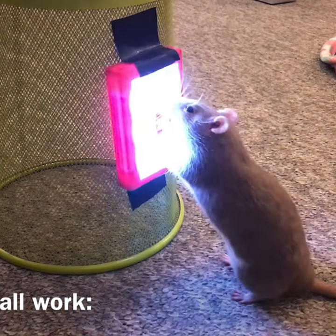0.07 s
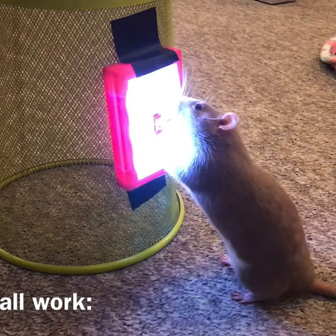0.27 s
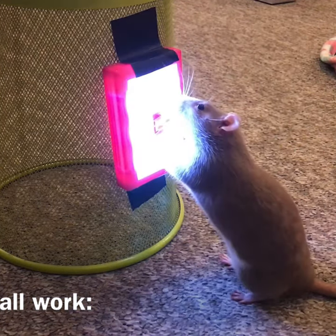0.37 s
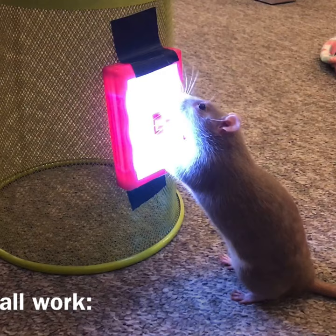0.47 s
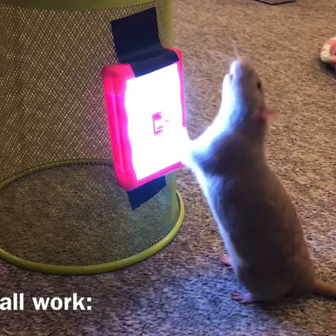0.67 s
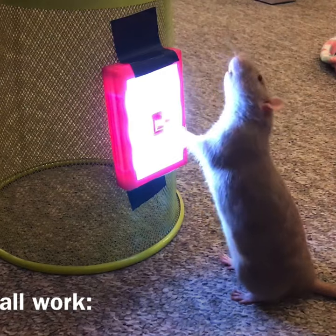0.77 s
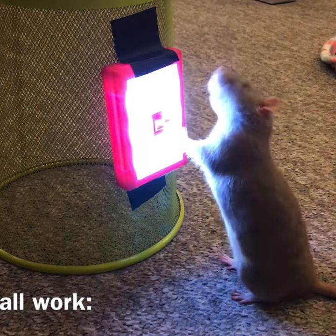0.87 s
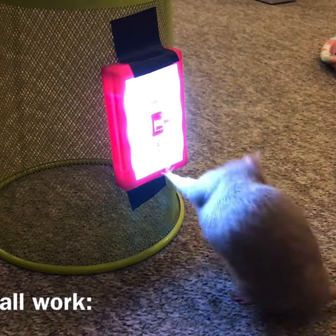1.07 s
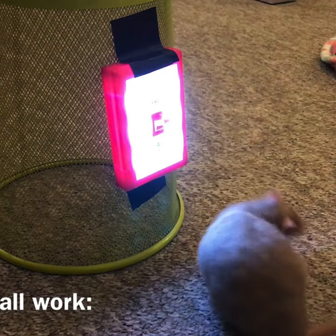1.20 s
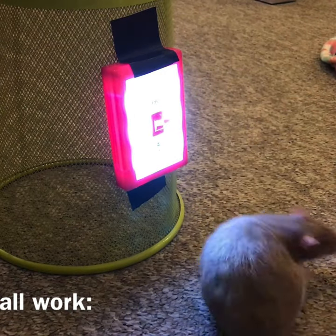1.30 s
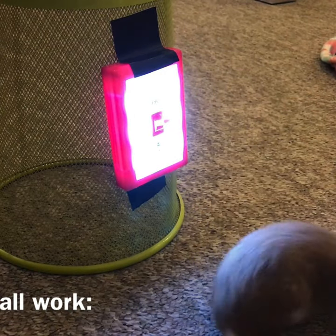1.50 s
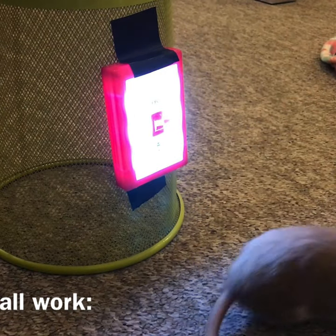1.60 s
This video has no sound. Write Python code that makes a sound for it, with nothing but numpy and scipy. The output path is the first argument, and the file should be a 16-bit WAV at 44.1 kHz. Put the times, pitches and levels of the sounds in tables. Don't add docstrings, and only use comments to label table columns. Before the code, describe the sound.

A plastic push light clicks twice under a rat's paws in a quiet carpeted room

```python
import sys
import numpy as np
from scipy import signal
from scipy.fft import rfft, irfft, next_fast_len
from scipy.io import wavfile
from scipy.ndimage import map_coordinates

SR = 44100
rng = np.random.default_rng(int(sys.argv[2]) if len(sys.argv) > 2 else 0)


def to_wav(s):
    ch = np.atleast_2d(s).T
    pcm = np.round(np.clip(ch, -1, 1) * 32767)
    wavfile.write(sys.argv[1], SR, pcm.astype(np.int16))


def how_loud(loudness_db):
    steps = np.asarray(loudness_db, float) / 20
    return 10 ** steps


N = 72765

# freq_hz, density_db_per_hz
RUMBLE_SPECTRUM = [(15, -36), (25, -1), (107, 1), (199, 2.5), (350, -2.5), (469, -9), (692, -10),
                   (926, -18.5), (1200, -29.5), (1560, -52.5), (2640, -120)]
# freq_hz, density_db_per_hz
HISS_SPECTRUM = [(530, -31.5), (900, -5), (1950, -2.5), (2120, -4.5), (2300, -5.5), (5000, -7),
                 (15500, -13.5)]
RUMBLE_DB, RUMBLE_LURCH_DB, HISS_DB = -67.5, 1.2, -76
LOW_CUT_HZ, TOP_HZ = 48, 15700

# freq_hz, t60_s
ROOM_T60 = [(600, 0.15), (1500, 0.25), (3500, 0.24), (6000, 0.37)]
# freq_hz, level_db
PRESS_ROOM_TONE = [(1000, -25.5), (1350, -1), (1650, -1.5), (2000, -11.5), (3400, 0), (4400, -14),
                   (5600, -26.5), (6600, -48.5)]
# freq_hz, level_db
RELEASE_ROOM_TONE = [(1050, -22), (1400, 1.5), (2000, -4.5), (3500, 2), (4400, -10.5), (5000, -12),
                     (6100, -17.5), (6900, -44)]
ROOM_DB, ROOM_START_S, ROOM_RISE_S, ROOM_HOLD_S = -46.5, 0.002, 0.0053, 0.03
ROOM_GRAIN_DB, LATE_DB, LATE_STRETCH = 1.5, -19, 3.7
WALL_DELAY_S = [.0045, .0068, .0085, .013, .016, .021]
WALL_LEVEL_DB = [-24, -17, -20, -17, -19, -23]

# start_s, pitch_hz, level_db
GROAN_PATH = [(0.278, 329.6, -80), (0.352, 229.9, -73), (.48, 288.2, -73.5), (0.579, 405.1, -74),
              (0.634, 147.5, -71.5), (.68, 183.7, -63.5), (0.708, 400.5, -74), (.79, 390, -80.5),
              (.87, 165.2, -72.5), (0.943, 163.4, -64), (1.002, 174.7, -70), (1.119, 305, -72),
              (1.219, 187.9, -64), (1.265, 182.5, -64), (1.339, 395.6, -73.5), (1.432, 222.7, -69.5),
              (1.511, 407.3, -68.5), (1.578, 255.6, -69)]
GROAN_WAVER, GROAN_FLUTTER_DB = 0.06, 5
OVERTONE_DB, GROAN_BLUR_S = -18.5, 0.015
BOOM_HZ, BOOM_WIDTH_HZ, BOOM_DB = 165.5, 36, 7

# start_s, length_s, level_db
FUR_SWELLS = [(0.091, 0.014, -68), (0.076, 0.075, -80.5), (0.754, 0.081, -75), (0.867, 0.18, -77),
              (1.05, 0.056, -95), (1.213, 0.052, -74.5), (1.26, 0.21, -82)]
# freq_hz, density_db_per_hz
FUR_SPECTRUM = [(300, -5.5), (1000, 8), (2500, 2), (4300, 0.5), (5600, 9), (6500, -5), (9500, -0.5),
                (14000, -12.5)]
# start_s, length_s, level_db
WHISKER_SWELLS = [
    (.088, .021, -72),
    (.76, 0.082, -81.5),
    (1.215, 0.025, -77.5),
]
# freq_hz, density_db_per_hz
WHISKER_SPECTRUM = [(4000, -35), (7500, 2), (9500, -3), (11500, -7), (14000, 0.5), (15600, -9)]
# start_s, length_s, level_db
PAW_SWELLS = [
    (0, 0.058, -75),
    (.075, .13, -71.5),
    (.68, 0.15, -84.5),
    (1.0, 0.11, -85.5),
    (1.25, 0.076, -81),
]
# freq_hz, density_db_per_hz
PAW_SPECTRUM = [(250, -35.5), (450, 2), (800, 4.5), (1000, -8), (1800, -11), (3000, -27)]

# start_s, level_db, pitch_hz, scratch_db
CLAW_TICKS = [(0.1278, -56, 1450, -3), (0.1653, -55.5, 1460, -4.5), (0.211, -68, 1480, -5),
              (0.365, -81, 3020, 26), (.845, -72, 408, -8), (.948, -87, 910, 9), (1.057, -62.5, 710, -5),
              (1.085, -64, 610, -6.5), (1.133, -55, 565, -6.5), (1.258, -63, 611.6, -7),
              (1.487, -59.5, 302.3, -8.5)]
# freq_hz, density_db_per_hz
SCRATCH_SPECTRUM = [(500, -4), (1500, 4.5), (3500, 1.5), (6000, -3.5), (7500, -8), (15000, -25)]
TICK_CYCLES, SCRATCH_S, TICK_ROOM_DB = 0.9, 0.0031, -22.5

SNAP_START_S = [.2184, .3680]
# level_db, polarity, room_share_db
SNAP_LEVELS = [
    (-23.5, 0.98, 1.5),
    (-26.5, -1.09, -3.5),
]
# freq_hz, level_db, decay_s
PRESS_MODES = [(1456, 0.5, 0.00066), (3030, 2.5, 0.00033), (2534, -13.5, 0.00057), (3500, -9.5, .0005),
               (4860, -15, 0.00034), (730, -27, 0.0018), (1341, -20, 0.0021), (6900, -37, .0003),
               (380, -33.5, 0.0023)]
# freq_hz, level_db, decay_s
RELEASE_MODES = [(1502, -4, 0.00066), (3120, -2.5, 0.00038), (2780, -4.5, 0.00039), (3760, -12.5, 0.0006),
                 (4854, -16.5, 0.00068), (766, -15, 0.00059), (1350, -27, 0.0037), (5820, -19.5, 0.00044),
                 (400, -20.5, 0.0005)]
MODE_LAG_S = [0, .0001, .0001, .0006, .0007, 0, .001, 0, 0]
NULL_HZ, NULL_Q = 996, 2.5


def unit(x):
    return x / np.sqrt(np.mean(x ** 2) + 1e-20)


def along(points, hz):
    f, v = np.transpose(points)
    return np.interp(np.log(hz + 1), np.log(f + 1), v)


def wobble(rate_hz):
    knots = rng.standard_normal(int(N / SR * 200) + 4)
    return map_coordinates(knots, [np.arange(N) * min(rate_hz, 199) / SR])


def filtered(x, response):
    m = next_fast_len(len(x) + 8192)
    gain = response(np.fft.rfftfreq(m, 1 / SR))
    return irfft(rfft(x, m) * gain, m)[:len(x)]


def noise(spectrum):
    return unit(filtered(rng.standard_normal(N), lambda hz: how_loud(along(spectrum, hz))))


def swells(rows):
    t = np.arange(N) / SR
    out = np.zeros(N)
    for start_s, length_s, level_db in rows:
        progress = np.clip((t - start_s) / length_s, 0, 1)
        out += how_loud(level_db) * np.sin(np.pi * progress) ** 0.5
    return out


def ring(start_s, hz, decay_s):
    t = np.clip(np.arange(N) / SR - start_s, 0, None)
    envelope = (t / decay_s / 2) ** 2 * np.exp(2 - t / decay_s)
    return envelope * np.sin(2 * np.pi * hz * t)


def room(hits, tone):
    out = np.zeros(N + SR)
    half = SR // 2
    for start_s, level_db in hits:
        grains = rng.standard_normal(half) * how_loud(ROOM_GRAIN_DB * wobble(210)[:half])
        hz, t, z = signal.stft(grains, SR, nperseg=256)
        fall_db = -60 * np.clip(t - ROOM_HOLD_S, 0, None) / along(ROOM_T60, hz)[:, None]
        decay = how_loud(fall_db) + how_loud(LATE_DB + fall_db / LATE_STRETCH)
        colour = how_loud(along(tone, hz)[:, None])
        tail = signal.istft(z * colour * decay, SR, nperseg=256)[1]
        tail = tail / np.sqrt(np.mean(tail[:SR // 20] ** 2))
        t = np.arange(len(tail)) / SR
        build_up = np.clip((t - ROOM_START_S) / ROOM_RISE_S, 0, 1)
        out[round(start_s * SR):][:len(t)] += how_loud(level_db) * tail * build_up
    return out[:N]


def walls(x):
    taps = np.zeros(SR // 20)
    for delay_s, level_db in zip(WALL_DELAY_S, WALL_LEVEL_DB):
        pair = np.array([0.6, -0.5])
        taps[round(delay_s * SR) + np.array([0, 5])] = how_loud(level_db) * rng.choice([-1, 1]) * pair
    return x + signal.fftconvolve(x, taps)[:N]


def rumble_and_hiss():
    rumble = how_loud(RUMBLE_DB + RUMBLE_LURCH_DB * wobble(20)) * noise(RUMBLE_SPECTRUM)
    return rumble + how_loud(HISS_DB) * noise(HISS_SPECTRUM)


def groan():
    start_s, pitch_hz, level_db = np.transpose(GROAN_PATH)
    t = np.arange(N) / SR
    hz = np.interp(t, start_s, pitch_hz) * (1 + GROAN_WAVER * wobble(30))
    phase = 2 * np.pi * np.cumsum(hz) / SR
    level = how_loud(np.interp(t, start_s, level_db, left=-120) + GROAN_FLUTTER_DB * wobble(35.28))
    tone = level * (np.sin(phase) + how_loud(OVERTONE_DB) * np.sin(2 * phase))
    blur = rng.standard_normal(SR // 5) * np.exp(-t[:SR // 5] / GROAN_BLUR_S)
    tone = tone + 0.5 * signal.fftconvolve(tone, blur / np.linalg.norm(blur))[:N]
    return filtered(tone, lambda f: how_loud(BOOM_DB * np.exp(-((f - BOOM_HZ) / BOOM_WIDTH_HZ) ** 2)))


def rustle():
    layers = (  # swells, spectrum, grain rate_hz
        (FUR_SWELLS, FUR_SPECTRUM, 150),
        (WHISKER_SWELLS, WHISKER_SPECTRUM, 190),
        (PAW_SWELLS, PAW_SPECTRUM, 60))
    out = np.zeros(N)
    for rows, spectrum, grain_hz in layers:
        out += swells(rows) * noise(spectrum) * how_loud(2.7 * wobble(grain_hz))
    return out


def claws():
    out, grit = np.zeros(N), noise(SCRATCH_SPECTRUM)
    hits = []
    for start_s, level_db, hz, scratch_db in CLAW_TICKS:
        t = np.clip(np.arange(N) / SR - start_s, 0, None)
        decay_s = TICK_CYCLES / hz
        body = ring(start_s, hz, decay_s) + 0.28 * ring(start_s, 1.58 * hz, decay_s)
        scratch = how_loud(scratch_db) * grit * (t > 0) * np.exp(-t / SCRATCH_S)
        out += how_loud(level_db) * (body + scratch)
        hits.append((start_s, level_db + scratch_db + TICK_ROOM_DB))
    return out + room(hits, RELEASE_ROOM_TONE)


def switch():
    out = np.zeros(N)
    snaps = zip(SNAP_START_S, SNAP_LEVELS, (PRESS_MODES, RELEASE_MODES),
                (PRESS_ROOM_TONE, RELEASE_ROOM_TONE))
    for start_s, (level_db, polarity, share_db), modes, tone in snaps:
        case = np.zeros(N)
        for (hz, mode_db, decay_s), lag_s in zip(modes, MODE_LAG_S):
            case += how_loud(mode_db) * ring(start_s + lag_s, hz, decay_s)
        case = signal.lfilter(*signal.iirnotch(NULL_HZ, NULL_Q, SR), case)
        out += walls(polarity * how_loud(level_db + 3) * case)
        out += room([(start_s, ROOM_DB + share_db)], tone)
    return out


def scene():
    return (rumble_and_hiss() + groan() + rustle() + claws() + switch())[None]


def roll_off(x):
    return signal.sosfilt(signal.butter(12, 15630, fs=SR, output="sos"), x)


def record(dry):
    def response(hz):
        return (hz < TOP_HZ) * hz ** 3 / (hz ** 3 + LOW_CUT_HZ ** 3)
    mix = filtered(dry[0], response)[None]
    return roll_off(mix)


dry = scene()
out = record(dry)
to_wav(out)
```